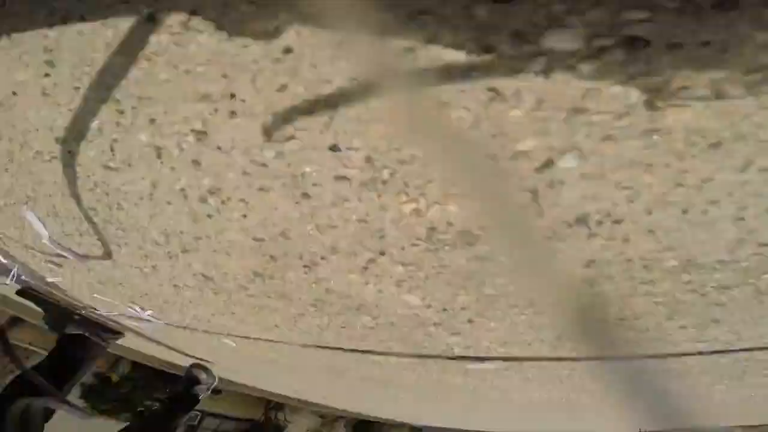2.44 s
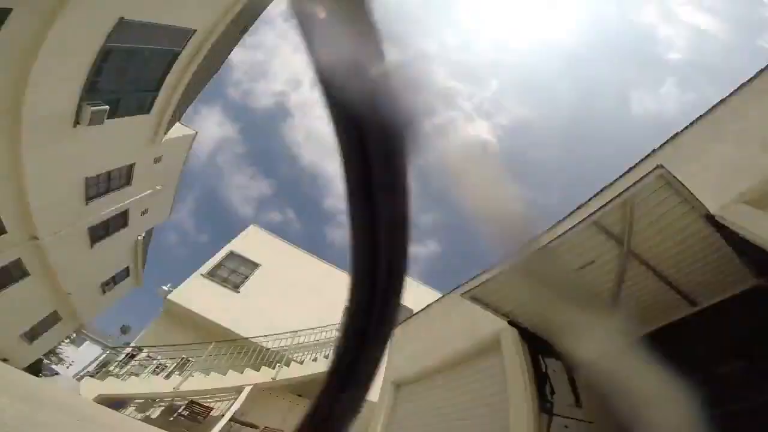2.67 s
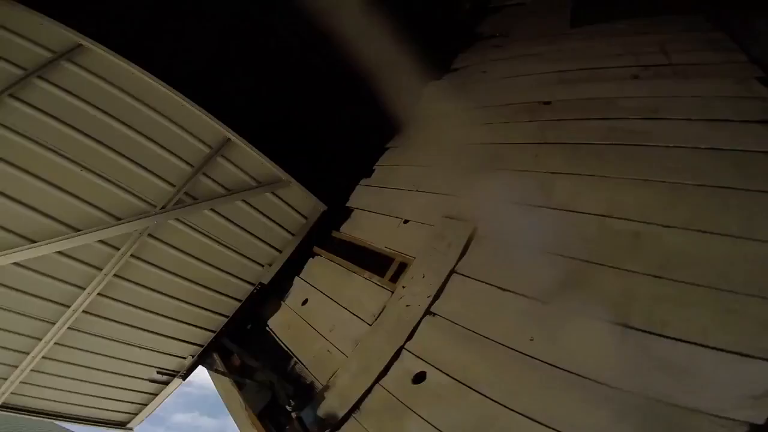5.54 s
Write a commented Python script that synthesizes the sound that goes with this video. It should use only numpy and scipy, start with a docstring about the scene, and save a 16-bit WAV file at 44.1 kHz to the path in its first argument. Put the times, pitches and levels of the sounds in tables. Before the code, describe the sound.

Faint outdoor air opens the scene. At 0.5 seconds a brittle crack overloads the microphone, followed by low thumps on its plastic housing, gritty scraping and quick clacks of loose hard pieces. A second crack with thumps lands at 1.2 seconds. From 1.9 to 3.1 seconds heavy blows come in a fast run, crunching and distorting, while the housing rumbles and its plastic sticks and slips over rough ground. The scraping dies away by 3.4 seconds. In the lull, at 3.8 seconds, a quieter bang from further off rings between the courtyard walls. From 4.1 to 4.7 seconds the housing tumbles with deep, duller thumps and more scraping. Low air buffeting joins as sharp clacks build to a loud clatter and one more crack around 5.1 seconds. A few knocks and a rapid ratcheting run of clacks finish by about 5.7 seconds.

```python
"""A courtyard, where hard things are smashed right against a camera in a plastic housing.
Brittle cracks, dense runs of tiny fractures, overload the microphone. Blows thump the housing
as it tumbles, its plastic sticks and slips over the ground, and loose hard parts clack in fast runs.
One bang comes from further off and rings between the walls. Faint outdoor air lies underneath."""
import sys
import numpy as np
from scipy import signal
from scipy.fft import rfft, irfft
from scipy.io import wavfile

SR = 44100
rng = np.random.default_rng(int(sys.argv[2]) if len(sys.argv) > 2 else 0)


def int16_out(signal):
    """Quantize to a 16-bit WAV file."""
    q = np.round(np.clip(np.atleast_2d(signal).T, -1, 1) * 32767)
    wavfile.write(sys.argv[1], SR, q.astype(np.int16))


N = 250869
SCENE_S = np.arange(N) / SR
T = np.arange(SR // 2) / SR  # seconds since a blow


def undb(db):
    """Decibels to gain."""
    return 10 ** (np.asarray(db) / 20)


def unit(x):
    """Scale to rms 1."""
    return x / np.sqrt(np.mean(x ** 2))


def burst_unit(x):
    """Scale a burst to the energy of 10 ms at rms 1."""
    return x / np.sqrt(np.sum(x ** 2) / (SR / 100))


def fade(t60_s):
    """Exponential decay, 60 dB in t60_s."""
    return np.exp(-np.log(1000) * T / t60_s)


def add(out, start_s, x):
    """Mix x into out at start_s."""
    i = int(start_s * SR)
    out[i:i + len(x)] += x[:len(out) - i]


def colour(x, spectrum):
    """Minimum-phase filter through (Hz, dB) points."""
    size = 4096
    hz, db = np.transpose(spectrum)
    bins_hz = np.maximum(np.arange(size // 2 + 1) * SR / size, 1)
    gain = undb(np.interp(np.log(bins_hz), np.log(hz), db))
    cepstrum = irfft(np.log(gain))
    cepstrum[1:size // 2] *= 2
    cepstrum[size // 2 + 1:] = 0
    return signal.fftconvolve(x, irfft(np.exp(rfft(cepstrum))))[:len(x)]


def noise(spectrum, length=N):
    """Coloured noise at rms 1."""
    return unit(colour(rng.standard_normal(length), spectrum))


def ring(modes, scatter_db, detune):
    """Decaying modes; every strike lands elsewhere and shares them out anew."""
    chance = rng.standard_normal((len(modes), 2))
    return sum(undb(db + scatter_db * a) * fade(t60_s) * np.sin(2 * np.pi * hz * (1 + detune * b) * T)
               for (hz, db, t60_s), (a, b) in zip(modes, chance))


def grains(length, per_s, spread_db):
    """Tiny fractures at random moments, a few much larger than the rest."""
    present = rng.random(length) < per_s / SR
    sizes = undb(spread_db * np.minimum(rng.exponential(size=length), 4))
    return present * sizes * rng.choice([-1, 1], length)


def stroke(start_s, length_s, change_db, attack_s=.006, release_t60_s=.13):
    """Envelope of a move: sets in quickly, swells or slackens, runs out."""
    t = np.maximum(SCENE_S - start_s, 0)
    attack = 1 - np.exp(-t / attack_s)
    release = np.exp(-np.log(1000) * np.maximum(t - length_s, 0) / release_t60_s)
    return attack * undb(change_db * np.minimum(t / length_s, 1)) * release


# Air spectrum. Each row: frequency in Hz, level in dB.
AIR_SPECTRUM = [(20, 0), (60, -7), (150, -3), (300, 0), (480, -10), (750, -8), (1400, -10), (2600, -15),
                (4000, -20), (6300, -22), (9000, -31), (15000, -40)]
# Air level. Each row: time in seconds, level in dB.
AIR_LEVELS = [(0, -55), (.5, -57), (.6, -64), (3.5, -63), (5.69, -61)]
def outdoor_air():
    """Faint outdoor air with one brief swish; its level drops just after 0.5 s."""
    level = undb(np.interp(SCENE_S, *np.transpose(AIR_LEVELS)))
    swish = undb(-48) * stroke(start_s=.318, length_s=.085, change_db=0)
    return (level + swish) * noise(AIR_SPECTRUM)


# Buffeting. Each row: time in seconds, level in dB.
BUFFET_LEVELS = [(3.6, -68), (3.72, -56), (4.6, -54), (4.8, -36), (4.92, -31), (5.05, -42), (5.2, -31),
                 (5.4, -32), (5.5, -60)]
def buffeting():
    """Deep, slow pressure swings on the microphone as the housing moves through the air."""
    swings = noise([(12, -8), (28, 0), (50, -3), (90, -20), (250, -60), (2000, -100)])
    return swings * undb(np.interp(SCENE_S, *np.transpose(BUFFET_LEVELS), left=-100, right=-100))


def courtyard_echo(x):
    """Dull reflections from the house fronts."""
    response = rng.standard_normal(len(T)) * fade(.7) * (1 - np.exp(-(T / .025) ** 2))
    response = colour(response, [(100, -5), (500, 0), (2500, -2), (7000, -9), (14000, -20)])
    return signal.fftconvolve(x, response / np.sqrt(np.sum(response ** 2)))[:N]


# Echoes of the bang. Each row: frequency in Hz, level in dB.
BANG_SPECTRUM = [(59, -55), (100, -25), (194, -14), (325, 0), (416, -20), (452, -13), (698, -16),
                 (759, -10), (1170, -29), (1810, -19), (1960, -29), (2470, -17), (2790, -26), (6000, -38),
                 (14000, -79)]
# Its ringing tones. Each row: frequency in Hz, level in dB, t60 in seconds.
BANG_TONES = [(322, -33, .9), (346, -35, .7), (772, -33, .5), (846, -33, .4), (2430, -37, .3),
              (2510, -37, .3)]
def far_bang(start_s=3.782, build_s=.022):
    """A blow across the yard: a thin direct snap, then the walls' echoes swell and linger."""
    swell = 1 - np.exp(-(T / build_s) ** 2)
    decay = 2 * fade(.26) + undb(-12) * fade(1.6)
    echoes = undb(-21) * noise(BANG_SPECTRUM, len(T)) * swell * decay
    snap = undb(-28) * burst_unit(colour(grains(len(T), 6000, 3) * fade(.07), GRIT_SPECTRUM))
    tones = swell * ring(BANG_TONES, scatter_db=1, detune=.003)
    taper = np.minimum(1, 10 * (T[-1] - T))
    out = np.zeros(N)
    add(out, start_s, (echoes + snap + tones) * taper)
    return out


# Modes of the plastic shell. Each row: frequency in Hz, level in dB, t60 in seconds.
SHELL_MODES = [(830, -14, .02), (1390, -5, .02), (1600, -6, .015), (1790, 0, .025), (2100, -6, .018),
               (2400, -3, .02), (2550, -1, .03), (2950, -10, .015), (3300, -6, .025), (4500, -20, .02),
               (5090, -18, .02), (6250, -15, .03), (7000, -23, .02), (8650, -30, .02)]
# Grit, splinters, humming mount and hollow walls. Each row: frequency in Hz, level in dB.
GRIT_SPECTRUM = [(700, -22), (1150, -7), (1600, 0), (2000, -4), (2450, -2), (2900, -10), (3300, -9),
                 (4000, -20), (5000, -18), (6300, -15), (8500, -27), (12000, -35), (16000, -50)]
SPLINTER_SPECTRUM = [(600, -20), (1500, -8), (3300, -3), (4000, -8), (5000, 0), (5650, -7), (6250, 2.5),
                     (6900, -3), (8000, -13), (11000, -21), (15000, -44)]
HUM_SPECTRUM = [(20, -27), (60, -19), (88, -7), (106, 0), (130, -9), (200, -13), (320, -22), (700, -34),
                (3000, -62)]
HOLLOW_SPECTRUM = [(30, -32), (100, -12), (250, 0), (450, 0), (800, -3), (1200, -7), (1700, -5),
                   (2300, -22), (6000, -45)]
# Slides. Each row: start and length in seconds, then scrape, hiss, hum and change by the end in dB.
GROUND_SLIDES = [(.53, .16, -47, -60, -40, 2), (.703, .033, -32.5, -36, -39, 0),
                 (.775, .07, -43, -49, -38, 1), (.87, .17, -37, -61, -38, -4),
                 (1.245, .15, -40, -53, -38, 0), (1.45, .18, -41, -45, -41, -6),
                 (1.67, .11, -57, -46, -60, -10), (1.925, .335, -33, -43, -38, -2),
                 (2.29, .26, -45, -47, -46, 2), (2.615, .13, -38, -57, -36, -5),
                 (2.79, .04, -32, -50, -35, -3), (2.91, .2, -42, -64, -31, -6),
                 (3.11, .16, -40, -55, -43, 4), (3.295, .115, -50, -55, -54, -5),
                 (4.042, .135, -39, -50, -48, 6), (4.37, .32, -35, -54, -38, 1),
                 (4.71, .31, -42, -61, -44, 4), (5.05, .03, -40, -54, -42, 0),
                 (5.09, .105, -30, -42, -39, -2), (5.21, .36, -36, -61, -40, -2),
                 (5.61, .08, -48, -84, -33, -8)]
def sliding():
    """The housing sticks and slips over rough ground; the rubbing makes its mount hum."""
    scrape_gain, hiss_gain, hum_gain = sum(
        np.outer(undb(levels_db), stroke(start_s, length_s, change_db))
        for start_s, length_s, *levels_db, change_db in GROUND_SLIDES)
    wait, strength = rng.random((600, 2)).T
    at = (np.cumsum(.009 + .016 * wait) * SR).astype(int)  # a slip every 9-25 ms
    slips = np.zeros(N)
    slips[at[at < N]] = undb(9 * strength[at < N])
    pressure = unit(.7 + signal.fftconvolve(slips, fade(.04))[:N])
    shell = unit(signal.fftconvolve(pressure * grains(N, 4000, 3), ring(SHELL_MODES, 1, .01))[:N])
    rasp = unit(colour(pressure * grains(N, 5000, 3), GRIT_SPECTRUM))
    hollow = unit(colour(pressure * grains(N, 3000, 3), HOLLOW_SPECTRUM))
    scrape = undb(-1.5) * shell + undb(-5) * rasp + undb(-7.5) * hollow
    shedding = .12 + signal.fftconvolve(slips, fade(.022))[:N]  # splinters fly mostly at a slip
    hiss = undb(-2.5) * unit(colour(shedding * grains(N, 6000, 2.5), SPLINTER_SPECTRUM))
    return scrape_gain * scrape + hiss_gain * hiss + hum_gain * noise(HUM_SPECTRUM)


def clack(db, ring_hz, splinter_db, contact_s=.003):
    """A short chattering contact rings the shell, favouring the modes near ring_hz."""
    modes = [(hz, mode_db + 10 * np.exp(-(np.log(hz / ring_hz) / .1) ** 2), t60_s)
             for hz, mode_db, t60_s in SHELL_MODES]
    contact = (1 - np.exp(-T / .0008)) * np.exp(-T / contact_s)
    force = contact * grains(len(T), 7000, 2.5)
    force[0] += 1  # first touch
    ringing = signal.fftconvolve(force, ring(modes, scatter_db=2, detune=.016))[:len(T)]
    low_cut = signal.butter(2, 1300, "highpass", fs=SR, output="sos")  # the clacks carry little below 1.3 kHz
    body = burst_unit(signal.sosfilt(low_cut, ringing))
    shedding = contact + undb(-24) * fade(.06)
    splinters = burst_unit(colour(shedding * grains(len(T), 9000, 3), SPLINTER_SPECTRUM))
    return undb(db + 1.2) * body + undb(splinter_db + .8) * splinters


# Single clacks. Each row: start in seconds, level in dB, favoured ring in Hz, splinter level in dB.
LOOSE_CLACKS = [(.62, -27, 1770, -38), (.633, -22, 1710, -38), (.879, -23, 2400, -44),
                (.897, -19, 2400, -36), (.925, -27, 2400, -47), (.937, -23, 2400, -43),
                (1.543, -34, 1720, -45), (1.64, -47, 2400, -46), (2.396, -41, 3300, -42),
                (2.489, -29, 1750, -41), (2.769, -31, 1720, -45), (2.874, -34, 1800, -54),
                (3.009, -33, 1350, -48), (3.211, -30, 1390, -42), (3.718, -61, 6230, -54),
                (4.354, -28, 2550, -44), (4.571, -30, 2400, -40), (4.59, -26, 2400, -46),
                (4.804, -33, 2400, -40), (4.833, -31, 2400, -36), (4.942, -21, 2400, -38),
                (4.97, -29, 1400, -38), (5.018, -10, 2540, -34), (5.077, -17, 1820, -26),
                (5.087, -11.5, 1830, -22), (5.116, -21, 1810, -31), (5.149, -22, 1810, -30),
                (5.168, -26, 1790, -34), (5.522, -28, 1800, -37), (5.554, -23, 1780, -44),
                (5.607, -20, 1390, -39)]
# Runs of clacks. Each row: start in seconds, count, gap in seconds, level in dB,
# change per clack in dB, favoured ring in Hz, splinter level in dB.
RATCHET_RUNS = [(.776, 5, .0205, -31, -.2, 2400, -38), (.965, 4, .02, -28, -3, 1400, -45),
                (3.1, 5, .017, -37, .2, 1500, -48), (4.727, 3, .021, -35, .3, 1610, -52),
                (4.886, 2, .024, -34, 3, 2500, -52), (5.371, 6, .0235, -22.5, -.2, 2000, -41)]
def clatter(jitter_s=.0006, scatter_db=1.2):
    """Loose hard parts clack singly, and in nearly even runs where an edge ratchets along."""
    out = np.zeros(N)
    for start_s, db, ring_hz, splinter_db in LOOSE_CLACKS:
        add(out, start_s, clack(db, ring_hz, splinter_db))
    for start_s, count, gap_s, db, step_db, ring_hz, splinter_db in RATCHET_RUNS:
        for k, (late, force) in enumerate(rng.standard_normal((count, 2))):
            change_db = k * step_db + scatter_db * force
            sound = clack(db + change_db, ring_hz, splinter_db + change_db)
            add(out, start_s + k * gap_s + jitter_s * late, sound)
    return out


def clunk(db, below_hz=2200):
    """A blunt, gritty contact rings the lower modes of the shell."""
    force = (1 - np.exp(-T / .0006)) * fade(.05) * grains(len(T), 5000, 2.5)
    modes = [mode for mode in SHELL_MODES if mode[0] < below_hz]
    response = ring(modes, scatter_db=2, detune=.04) * fade(.02)
    return undb(db) * burst_unit(signal.fftconvolve(force, response)[:len(T)])


# After-ring of housing and mount. Each row: frequency in Hz, level in dB, t60 in seconds.
MOUNT_MODES = [(104, -21, .26), (158, -14, .14), (235, -14, .075), (340, -17, .04)]
# Crunch at the contact. Each row: frequency in Hz, level in dB.
CRUNCH_SPECTRUM = [(130, -10), (250, 5), (350, 5), (520, 0), (680, -1), (1100, -8), (1600, -13),
                   (3000, -38)]
def knock(db, hz, t60_s, crunch_db, grit_db):
    """The housing swings and rings low while grit is crushed at the point of contact."""
    swing = fade(t60_s) * np.sin(2 * np.pi * hz * T)
    push = 1 - np.exp(-T / .0008)
    thump = undb(.3) * push * (swing + ring(MOUNT_MODES, scatter_db=2.5, detune=.04))
    contact = (1 - np.exp(-T / .0006)) * (fade(.04) + undb(-23) * fade(.13))
    force = contact * grains(len(T), 6000, 3)
    crunch = undb(crunch_db + 5.5) * burst_unit(colour(force, CRUNCH_SPECTRUM))
    grit = undb(grit_db - .5) * burst_unit(colour(force, GRIT_SPECTRUM))
    return undb(db) * (thump + crunch + grit)


# Contacts. Each row: thump t60 in seconds, then crunch, grit and shell in dB relative to the blow.
HARD_CONTACT, SOFT_CONTACT = np.array([(.05, -13.5, -21, -17), (.14, -34, -44, -37)])
# Blows. Each row: start in seconds, level in dB, thump in Hz, softness 0-1, contacts, gap in seconds.
HOUSING_BLOWS = [(.519, -13, 190, .15, 1, .015), (.573, -16, 155, .1, 1, .015),
                 (.617, -13, 156, .05, 1, .015), (.629, -5.5, 108, .15, 4, .014),
                 (1.135, -40, 90, .9, 1, .015), (1.238, -15, 210, .15, 1, .015),
                 (1.324, -16, 100, 0, 1, .015), (1.349, -8, 125, .05, 2, .014),
                 (1.69, -31, 58, .8, 1, .015), (1.906, -2, 185, .15, 3, .0195),
                 (1.98, -5.5, 170, 0, 2, .012), (2.066, -6.5, 140, 0, 2, .008),
                 (2.129, -6.5, 145, 0, 3, .011), (2.178, -7, 145, 0, 2, .008), (2.224, -9, 140, 0, 2, .011),
                 (2.338, -7, 172, .05, 1, .015), (2.442, -8, 170, .05, 1, .015),
                 (2.533, -11, 150, .1, 2, .026), (2.602, -6, 145, .1, 3, .016),
                 (2.692, -10, 175, .1, 2, .009), (2.782, -3.5, 165, .05, 4, .015),
                 (2.898, -3.5, 140, .1, 5, .019), (3.033, -4, 130, .2, 3, .012),
                 (3.211, -27, 160, 0, 2, .02), (3.722, -44, 120, .7, 1, .015),
                 (4.115, -3, 130, .15, 3, .018), (4.193, -1, 104, .4, 1, .015), (4.262, -9, 92, 1, 1, .015),
                 (4.343, -14, 85, .9, 1, .015), (4.4, -7, 94, .3, 3, .012),
                 (4.482, -3.5, 185, .25, 2, .009), (4.666, -10, 94, 1, 1, .015),
                 (4.87, -24, 70, .9, 2, .02), (4.96, -18, 145, 0, 3, .016), (5.185, -20, 130, .4, 1, .015),
                 (5.283, -12, 112, 0, 4, .012), (5.42, -23, 70, .9, 1, .015),
                 (5.611, -21, 150, .2, 1, .015)]
def tumbling(bounce_loss_db=2.0, bounce_softening=.11):
    """Blows bounce on, weaker and softer each time; soft contacts ring longer and crush less grit."""
    out = np.zeros(N)
    for start_s, first_db, hz, first_softness, count, gap_s in HOUSING_BLOWS:
        for k in range(count):
            softness = min(first_softness + k * bounce_softening, 1)
            t60_s, crunch_db, grit_db, shell_db = (1 - softness) * HARD_CONTACT + softness * SOFT_CONTACT
            db = first_db - k * bounce_loss_db
            thump_hz = hz * (1 + .06 * min(k, 1) * rng.standard_normal())  # bounces hit another corner
            sound = knock(db, thump_hz, t60_s, crunch_db, grit_db) + clunk(db + shell_db)
            add(out, start_s + k * gap_s, sound)
    return out


# Shaken housing. Each row: frequency in Hz, level in dB.
RUMBLE_SPECTRUM = [(20, 0), (45, -1), (70, -6), (112, 1), (210, -2), (320, -13), (700, -22), (1200, -34),
                   (3000, -50)]
def housing_rumble(relative_db=-25, t60_s=.55):
    """The shaken housing rumbles on after each blow."""
    power = np.zeros(N)
    for start_s, db, *_ in HOUSING_BLOWS:
        add(power, start_s, (undb(db + relative_db) * fade(t60_s)) ** 2)
    return np.sqrt(power) * noise(RUMBLE_SPECTRUM)


# Fractures. Each row: frequency in Hz, level in dB.
CRACK_SPECTRUM = [(150, -10), (300, -3), (450, -5), (700, -2), (1050, 1), (1350, -2), (1600, 1), (2000, -5),
                  (2500, 0), (3800, -6), (6500, -3), (9000, -12), (12000, -13), (16000, -24)]
# Breaks. Each row: start in seconds, level in dB, crush time in seconds, treble corner in Hz, tail in dB.
BRITTLE_BREAKS = [(0.508, -7, .007, 7000, -22), (1.224, -6, .007, 7000, -11), (1.903, -3.5, .007, 800, -15),
                  (1.916, -22, .003, 9000, -14), (1.969, -11, .003, 3500, -17),
                  (2.321, -31, .012, 1500, -6), (2.334, -9, .009, 450, -15), (2.430, -7, .008, 5500, -8),
                  (2.520, -4, .005, 1800, -10), (2.537, -15, .017, 4200, -22), (2.603, -16, .002, 500, -16),
                  (2.782, -2, .002, 1000, -22), (2.802, -17, .009, 1200, -15),
                  (2.897, -9.5, .005, 550, -16), (2.943, -15, .003, 1000, -18),
                  (5.086, -14, .005, 1200, -14)]
def cracking():
    """Dense fractures overload the microphone while a piece gives way, then crumble off."""
    out = np.zeros(N)
    for start_s, db, crush_s, corner_hz, tail_db in BRITTLE_BREAKS:
        crushing = 1 / (1 + (T / crush_s) ** 12)
        force = grains(len(T), 16000, 2.5) * (crushing + undb(tail_db) * fade(.075))
        soften = signal.butter(1, corner_hz, fs=SR, output="sos")
        fractures = signal.sosfilt(soften, colour(force, CRACK_SPECTRUM))
        crush_rms = np.sqrt(np.sum(fractures ** 2 * crushing) / np.sum(crushing))
        add(out, start_s, undb(db + 3.5) * np.tanh(.85 * fractures / crush_rms))
    return out


def scene():
    """Close smashing and its faint echo over the air and the far bang, in mono."""
    near = sliding() + clatter() + tumbling() + housing_rumble() + cracking()
    background = outdoor_air() + buffeting() + undb(-43) * courtyard_echo(near) + far_bang()
    return (background + near)[None]


def record(dry, muffle_hz=9000, low_cut_hz=22, top_hz=15800):
    """The housing dulls the treble, the hardest blows overload, and both band edges are cut."""
    muffle = signal.butter(2, muffle_hz, fs=SR, output="sos")
    low_cut = signal.butter(1, low_cut_hz, "highpass", fs=SR, output="sos")
    top_cut = signal.ellip(8, .2, 70, top_hz, fs=SR, output="sos")
    heard = signal.sosfilt(low_cut, signal.sosfilt(muffle, dry))
    return signal.sosfilt(top_cut, np.clip(heard, -1, 1))


dry = scene()
out = record(dry)
int16_out(out)
```